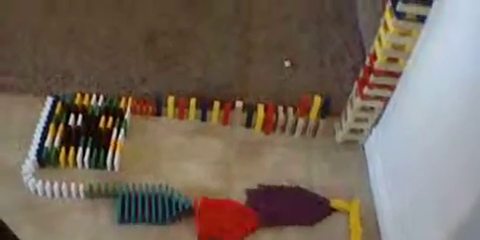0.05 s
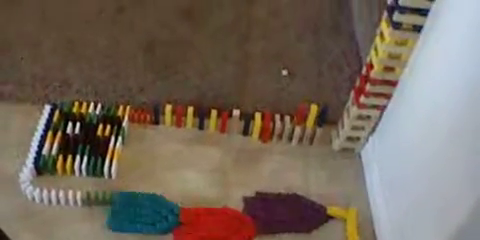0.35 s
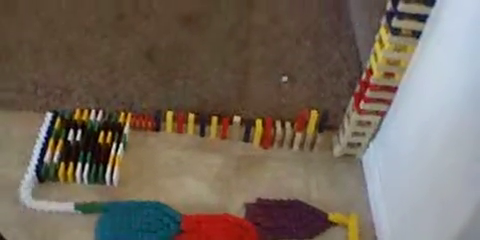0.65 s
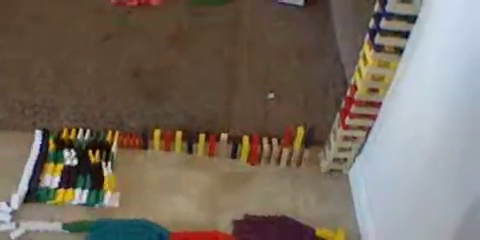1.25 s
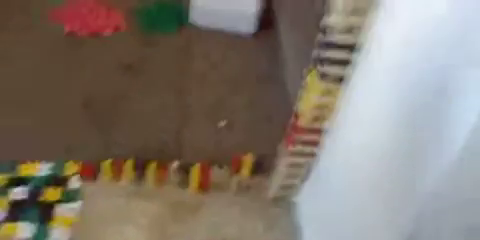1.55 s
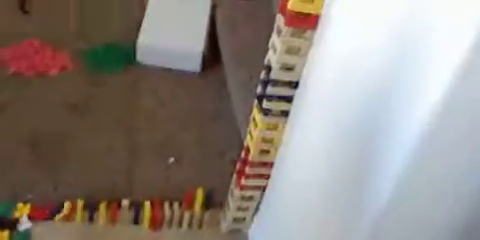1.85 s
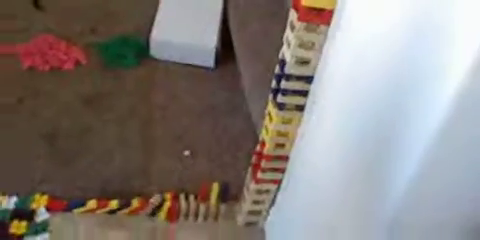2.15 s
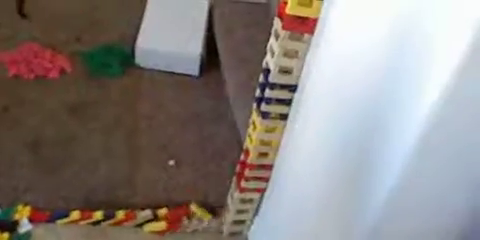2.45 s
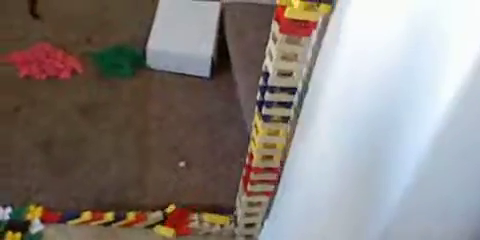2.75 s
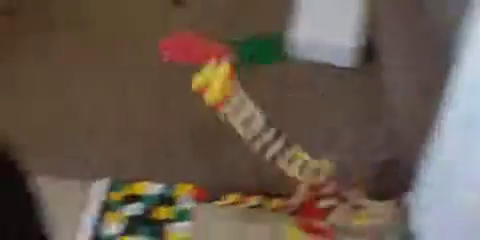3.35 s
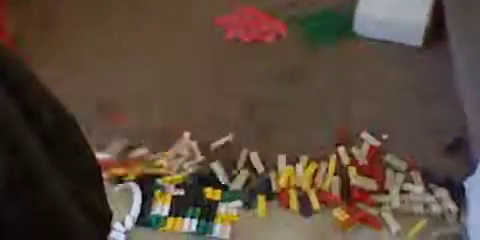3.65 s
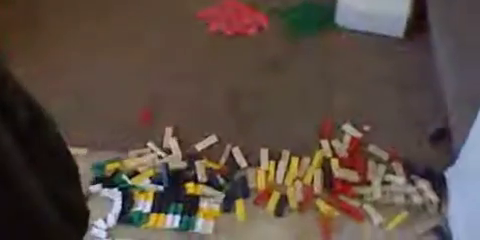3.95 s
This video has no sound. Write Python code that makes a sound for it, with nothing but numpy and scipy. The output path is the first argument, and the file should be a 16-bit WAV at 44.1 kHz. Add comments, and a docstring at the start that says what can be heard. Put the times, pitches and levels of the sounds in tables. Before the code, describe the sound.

Dominoes topple in a rattling chain, then a tall block tower crashes down indoors.

```python
"""Dominoes on a board laid over carpet in a small room, a small microphone nearby, a low mains hum beneath.
First two fields of plastic tiles rattle down, each contact a crack and a short ring; the board knocks.
From about 1.9 s a slower row of wooden blocks follows and knocks the foot out of a tall tower.
The tower sheds pieces from 2.6 s and crashes down in a heap from 3.3 s; the walls smear the clatter."""
import sys
import numpy as np
from scipy import signal
from scipy.fft import rfft, irfft
from scipy.io import wavfile

SR = 44100
rng = np.random.default_rng(int(sys.argv[2]) if len(sys.argv) > 2 else 0)


def int16_out(signal):
    """Quantize to a 16-bit WAV file."""
    q = np.round(np.clip(np.atleast_2d(signal).T, -1, 1) * 32767)
    wavfile.write(sys.argv[1], SR, q.astype(np.int16))


N = 176400
TIME = np.arange(N) / SR

# ring of a plastic tile and of the floor under it (frequency [Hz], level [dB], t60 [s])
PLASTIC_MODES = [(2192, -1.5, 0.01), (3530, 0.5, 0.0073), (4254, 5.5, 0.0086), (5756, -2, 0.027),
                 (7120, -14.5, 0.0099)]
FLOOR_MODES = [(336, 0.5, 0.021), (612, -1.5, 0.023), (775.4, 1, 0.028), (1000, -0.5, 0.039),
               (1595, 1, 0.027)]


def amp(db):
    """Decibels to gain."""
    return 10 ** (np.asarray(db) / 20)


def unit(x):
    """Scale to rms 1."""
    return x / np.sqrt(np.mean(x ** 2) + 1e-20)


def on_log_axis(points, size):
    """Interpolate (frequency [Hz], value) points at the bins of a transform."""
    hz, value = np.array(points, float).T
    return np.interp(np.log(np.arange(size // 2 + 1) * SR / size + 1), np.log(hz), value)


def colour(x, points, size=4096):
    """Minimum-phase EQ through (frequency [Hz], gain [dB]) points."""
    cepstrum = irfft(np.log(amp(on_log_axis(points, size))))
    cepstrum[1:size // 2] *= 2
    cepstrum[size // 2 + 1:] = 0
    return signal.fftconvolve(x, irfft(np.exp(rfft(cepstrum))))[:N]


def room_tone(air_db=-54.5):
    """Mains hum and faint air, there from the start."""
    hum_tones = [(59.2, -49.5), (118.4, -72), (199.2, -63.5)]  # (frequency [Hz], rms level [dB])
    air_eq = [(25, 0), (40, 0), (80, -1.5), (500, -8.5), (1500, -28.5), (5000, -20.5), (8500, -33.5)]  # (frequency [Hz], gain [dB])
    hum = sum(np.sqrt(2) * amp(db) * np.sin(2 * np.pi * (hz * TIME + rng.random()))
              for hz, db in hum_tones)
    return hum + amp(air_db) * unit(colour(rng.standard_normal(N), air_eq))


def room(x, size=32768, echoes=12):
    """One spot to the microphone: direct sound, floor and wall echoes, a tail shorter in the treble."""
    reverb_times = [(150, 0.25), (500, 0.45), (1500, 0.57), (3500, 0.44), (7500, 0.24)]  # (frequency [Hz], t60 [s])
    tail_db, tail_delay_s, early_db, early_s = -5, 0.0069, -7, .012
    t = TIME[:size]
    noise, tail = rfft(rng.standard_normal(size)), 0
    for k, (_, t60) in enumerate(reverb_times):
        band = on_log_axis([(hz, j == k) for j, (hz, _) in enumerate(reverb_times)], size)
        tail = tail + irfft(noise * band) * np.exp(-np.log(1000) * t / t60)
    response = amp(tail_db) * unit(tail * np.clip(t / tail_delay_s - 1, 0, 1)) / np.sqrt(size)
    lags = (SR * early_s * rng.uniform(0.1025, 1, echoes)).astype(int)
    response[lags] += amp(early_db) * rng.choice([-1, 1], echoes) / np.sqrt(echoes)
    response[0] += 1
    return signal.fftconvolve(x, unit(response) / np.sqrt(size))[:N]


def contacts(times, strengths, modes, crack_db, spread, tilt_db=None, size=1024):
    """Each contact is a crack of noise and a ring; no two pieces have quite the same pitch."""
    crack_decay_s, pivot_hz = 0.00081, 4000
    t = TIME[:size]
    ring = 0
    for hz, db, t60 in modes:
        weight, detune = rng.standard_normal((2, len(times), 1))
        tone = np.sin(2 * np.pi * hz * np.exp(spread * detune) * t)
        ring = ring + amp(db) * weight * np.exp(-np.log(1000) * t / t60) * tone
    crack = rng.standard_normal((len(times), size)) * np.exp(-t / crack_decay_s)
    grains = unit(ring) + amp(crack_db) * unit(crack)
    grains *= (strengths / np.sqrt(np.sum(grains ** 2, axis=1)))[:, None]
    if tilt_db is not None:  # brightness of each contact, per octave
        octaves = np.clip(np.log2(np.linspace(1, SR / 2, size + 1) / pivot_hz), -2, 1)
        grains = irfft(rfft(grains, 2 * size) * amp(tilt_db[:, None] * octaves))[:, :size]
    places = (np.maximum(times, 0) * SR).astype(int)[:, None] + np.arange(size)
    return np.bincount(places.ravel(), grains.ravel(), N)[:N]


def clatter(levels, modes, eq, click_db, knock_db, spread, count, scatter_db=4, crack_db=10):
    """A stream of contacts of uneven strength: clicks above, knocks on the floor below."""
    crossover_hz = 1240
    when, clicks, knocks = np.array(levels).T
    length = when[-1] - when[0]
    times = when[0] + length * (np.arange(count) + rng.uniform(0, 2, count)) / count
    strengths = amp(scatter_db * np.clip(rng.standard_normal(count), -2, 2))
    out = 0
    for side, rings, db in (("high", modes, clicks + click_db), ("low", FLOOR_MODES, knocks + knock_db)):
        stream = colour(contacts(times, strengths, rings, crack_db, spread), eq)
        band = signal.sosfilt(signal.butter(3, crossover_hz, side, fs=SR, output="sos"), stream)
        out = out + unit(band) * np.sqrt(length * SR / N) * amp(np.interp(TIME, when, db))
    return out


def hollow(x, ring_db, width_hz=55):
    """A narrow resonance under the falling tiles shifts as the front advances."""
    pitch_path = [(.25, 730), (.57, 1000), (.72, 874), (1.22, 830), (1.39, 835), (1.44, 960), (1.54, 894),
                  (1.66, 820)]  # (time [s], frequency [Hz])
    turn = np.exp(2j * np.pi * np.cumsum(np.interp(TIME, *np.array(pitch_path).T)) / SR)
    pole = np.exp(-np.pi * width_hz / SR)
    resonance = 2 * np.real(turn * signal.lfilter([1 - pole], [1, -pole], x / turn))
    return x + amp(ring_db) * resonance


def tile_fields():
    """Two fields of plastic tiles run down in turn, each at its own place in the room."""
    # rattle of each field (time [s], relative click level [dB], relative knock level [dB])
    first_levels = [(0, -23.5, -41.5), (.15, -41.5, -53), (.25, -30, -41), (.32, -38, -50),
                    (.44, -35.5, -47), (.52, -35, -49.5), (.59, -38, -45), (.73, -37.5, -51),
                    (.8, -51, -53), (.9, -49.5, -57.5), (.97, -45, -55.5), (1.13, -48, -55)]
    second_levels = [(1.13, -48, -57), (1.22, -43, -45.5), (1.37, -44.5, -43), (1.45, -36.5, -40.5),
                     (1.6, -35, -44), (1.7, -39.5, -52), (1.74, -78, -76), (1.85, -72, -76)]
    # tone of each field (frequency [Hz], gain [dB])
    first_eq = [(110, -21), (160, -2), (225, -14), (300, 1.5), (400, -7.5), (550, -8.5), (980, -7.5),
                (1400, -5.5), (3800, -4), (5900, -5), (8500, -16)]
    second_eq = [(120, -11.5), (300, -14.5), (720, -8.5), (880, -7.5), (1080, -6.5), (1600, 0.5),
                 (4200, -2.5), (7000, -7), (8500, -20.5)]
    first = clatter(first_levels, PLASTIC_MODES, first_eq,
                    click_db=-5, knock_db=3.5, spread=0.219, count=620)
    second = clatter(second_levels, PLASTIC_MODES, second_eq,
                     click_db=-0.5, knock_db=-1, spread=0.224, count=750)
    return room(hollow(first, ring_db=-6)) + room(hollow(second, ring_db=5))


def board_knocks(rise_s=0.0088, blur_hz=14):
    """A whole rank lands flat: the board gives a brief hollow knock at a blurred pitch."""
    landings = [(0.011, 839, -37), (0.23, 295, -39.5), (0.309, 303, -33), (.558, 280.3, -33.5),
                (.672, 910, -39), (1.368, 841, -36), (1.45, 920, -37.5), (1.53, 893, -42.5),
                (2.979, 950, -32.5), (3.32, 780, -22), (3.417, 963, -21), (3.485, 770, -25.5),
                (3.752, 801, -24.5)]  # (time [s], pitch [Hz], level [dB])
    phase_drift = np.cumsum(rng.standard_normal(N)) * np.sqrt(2 * np.pi * blur_hz / SR)
    out = 0
    for start, hz, db in landings:
        age = np.maximum(TIME - start, 0) / rise_s
        out = out + amp(db) * age * np.exp(1 - age) * np.sin(2 * np.pi * hz * TIME + phase_drift)
    return out


def clacks(blows, modes, eq, knock_db, crack_db, spread, count, click_db=14, rebound_db=-1):
    """Each blow has a few fading rebounds; all of them also knock on the floor."""
    floor_eq = [(60, -32), (150, -6.5), (380, -8.5), (640, 2.5), (900, 0), (1400, -0.5), (2500, -25),
                (6000, -42)]  # (frequency [Hz], gain [dB])
    start, db, floor_db, rattle_s, tilt_db = np.array(blows).T[:, :, None]
    step = np.arange(count)
    is_rebound = step > 0
    progress = (step + rng.uniform(-.5, .5, (len(blows), count))) / count * is_rebound
    times = (start + rattle_s * progress).ravel()
    strengths = amp(db + rebound_db * is_rebound) * np.exp(-progress)
    click = contacts(times, strengths.ravel(), modes, crack_db, spread, np.repeat(tilt_db, count))
    knock = contacts(times, (strengths * amp(floor_db)).ravel(), FLOOR_MODES, crack_db=1, spread=.12)
    return amp(click_db) * colour(click, eq) + amp(knock_db) * colour(knock, floor_eq)


def tile_slaps():
    """Plastic tiles slap down and bounce."""
    # (time [s], relative level [dB], floor knock offset [dB], rattle [s], brightness [dB/octave])
    slaps = [(.0144, -15, -38, 0.014, 6), (.0275, -22.5, -8, 0.017, -6), (.222, -26.5, -2, 0.033, -8),
             (.2828, -15.5, -14, 0.022, -3), (.310, -19, -38, 0.022, 0.5), (.5482, -23.5, -14, 0.017, 8),
             (.563, -15.5, -25, 0.033, 0), (.842, -31.5, -7, 0.03, 1), (.9223, -30.5, -10, 0.031, -5),
             (.9552, -23.5, -26, .045, -2.5), (1.004, -28, -25, 0.04, -3), (1.3892, -28.5, -20, 0.0051, 5),
             (1.4022, -16.5, -19, 0.012, 0), (1.5653, -17, -9, 0.025, -3.5), (1.7, -24.5, -8, 0.021, 4.5)]
    eq = [(300, -24.5), (1000, -5.5), (2000, -2.5), (4000, 4.5), (7500, 1), (8500, -14)]  # (frequency [Hz], gain [dB])
    return room(clacks(slaps, PLASTIC_MODES, eq, knock_db=11.5, crack_db=10, spread=0.11, count=7))


def tile_snaps(gain_db=14):
    """Single tiles snap edge against edge: bright clicks that stand out of the rattle."""
    snaps = [(.0272, -15.5), (0.3039, -15.5), (0.3096, -16.5), (1.4102, -13), (1.417, -21), (1.4242, -22),
             (1.439, -19), (1.466, -16.5), (1.4712, -17.5), (1.475, -26), (1.484, -23), (1.49, -15.5),
             (1.5235, -19), (1.5295, -16.5)]  # (time [s], relative level [dB])
    edge_modes = [(4620, -8.5, .008), (5680, 0, 0.0066), (7140, 0.5, .012)]  # (frequency [Hz], level [dB], t60 [s])
    eq = [(1000, -20), (3000, 6), (5000, 2.5), (7500, -1), (8500, -12)]  # (frequency [Hz], gain [dB])
    times, db = np.array(snaps).T
    clicks = contacts(times, amp(db + gain_db), edge_modes, crack_db=0.5, spread=0.069)
    return room(colour(clicks, eq))


def wooden_row():
    """Wooden blocks topple: a quiet running clatter, with clacks where they strike each other."""
    wood_modes = [(1440, -8.5, .03), (3050, -11, .02), (4110, -2.5, 0.015), (4580, -4.5, 0.017),
                  (6000, -10.5, 0.013), (7300, -8.5, 0.02)]  # (frequency [Hz], level [dB], t60 [s])
    run_levels = [(1.98, -65, -62), (2.12, -57.5, -56), (2.18, -46.5, -48), (2.38, -50.5, -53),
                  (2.46, -50, -49.5), (2.58, -51, -50), (2.8, -50.5, -55.5), (2.93, -49.5, -52.5),
                  (3.12, -32, -44.5), (3.26, -48, -51.5)]  # (time [s], relative click level [dB], relative knock level [dB])
    # (time [s], relative level [dB], floor knock offset [dB], rattle [s], brightness [dB/octave])
    blows = [(1.931, -43, -12, 0.014, 5), (2.0657, -40.5, -5, 0.021, 2), (2.1505, -29.5, -8, 0.019, -3),
             (2.183, -31, -19, 0.018, 7.5), (2.3059, -31.5, -4, 0.008, 10.5), (2.3208, -34, -8.5, .016, 3),
             (2.3957, -27.5, -17, 0.0046, -2), (2.4279, -19.5, -16, 0.0077, 5), (2.443, -23, -20, 0.012, 0),
             (2.473, -27, -15, .012, -1), (2.487, -24.5, -13, 0.0063, 0.5),
             (2.5102, -20.5, -21, 0.0076, -0.5), (2.8789, -38.5, 7.5, 0.022, 12),
             (2.9522, -26, -16, 0.017, -7.5), (3.05, -28, -4, 0.0048, -8), (3.1852, -22, -14, 0.014, -9),
             (3.263, -12.5, -20, 0.0022, -6.5), (3.27, -11.5, -6, 0.0032, -4.5)]
    # tone of the run and of the blows (frequency [Hz], gain [dB])
    run_eq = [(110, -12), (155, 8.5), (230, -4.5), (620, -1), (1000, -6.5), (2100, -11.5), (3300, -13.5),
              (5400, -19.5), (7300, -25.5), (8500, -37)]
    blow_eq = [(300, -23), (1000, -17.5), (2200, -6), (4200, 2.5), (5500, -1.5), (7300, -5), (8500, -20.5)]
    run = clatter(run_levels, wood_modes, run_eq,
                  click_db=-3, knock_db=3.5, spread=0.15, count=450, scatter_db=2, crack_db=9)
    strikes = clacks(blows, wood_modes, blow_eq,
                     knock_db=21.5, crack_db=3, spread=0.065, count=6, rebound_db=-1.5)
    return room(run) + room(strikes)


def tower_collapse(spots=3):
    """Storeys give way and land; the pieces scatter over several spots, each with its own echoes."""
    # (time [s], relative level [dB], floor knock offset [dB], rattle [s], brightness [dB/octave])
    blows = [(2.5998, -13.5, -13, 0.012, -1), (2.6135, -14.5, -1, 0.017, 5.5),
             (2.633, -13, -4.5, 0.025, 2.5), (2.976, -20, 0, 0.018, -4), (3.061, -19.5, -11, .012, -1),
             (3.0774, -14.5, -1.5, 0.029, -2.5), (3.283, -17, -12, 0.004, -1),
             (3.2887, -6, -17, 0.001745, 10), (3.2937, -9.5, -8.5, .002, 11), (3.3195, -5, -8.5, 0.016, -3),
             (3.342, -7.5, -16, 0.022, -4), (3.4444, -3.5, -15.5, 0.025, 4.5), (3.47, -2.5, -7, 0.03, 2.5),
             (3.565, -9.5, -18, 0.03, -1.5), (3.6608, -3.5, -20, 0.024, 16.5),
             (3.6792, -4.5, -11, 0.026, 5.5), (3.9188, -8, -38, .012, -0.5)]
    heap_levels = [(3.305, -21, -31), (3.345, -30, -19.5), (3.37, -28, -24), (3.41, -21, -22),
                   (3.485, -23, -31), (3.515, -46, -25.5), (3.55, -29.5, -40), (3.595, -15.5, -25),
                   (3.64, -16, -23), (3.675, -9, -22), (3.715, -16, -43), (3.76, -27.5, -25.5),
                   (3.79, -21, -27), (3.93, -23.5, -30.5), (4.0, -34.5, -31)]  # (time [s], relative click level [dB], relative knock level [dB])
    # tone of the blows and of the heap (frequency [Hz], gain [dB])
    blow_eq = [(300, -8.5), (900, 3), (2000, 3), (3500, 4.5), (5000, 2), (7000, -5), (8500, -17)]
    heap_eq = [(60, -7), (146, 2.5), (190, -3.5), (350, -3), (560, -1), (800, 2), (1500, 0.5), (3400, 2),
               (7500, -2.5), (8500, -19)]
    out = 0
    for spot in range(spots):
        storeys = clacks(blows[spot::spots], PLASTIC_MODES, blow_eq,
                         knock_db=16, crack_db=7, spread=0.22, count=9)
        heap = clatter(heap_levels, PLASTIC_MODES, heap_eq,
                       click_db=-2, knock_db=-2.5, spread=0.192, count=280)
        out = out + room(storeys + heap / np.sqrt(spots))
    return out


def tower_thuds():
    """The trunk, then the top of the tower meet the floor, each with a burst of low noise."""
    landings = [(3.342, -17.5, 0.014), (3.656, -26.5, 0.033)]  # (time [s], level [dB], decay [s])
    eq = [(40, -27), (90, 1), (200, 2), (350, 7.5), (600, -0.5), (1500, -32)]  # (frequency [Hz], gain [dB])
    swell = 0
    for start, db, decay_s in landings:
        age = np.maximum(TIME - start, 0) / decay_s
        swell = swell + amp(db) * np.sqrt(2 * np.e * age) * np.exp(-age)
    return room(swell * unit(colour(rng.standard_normal(N), eq)))


def scene():
    """Room tone, tiles, blocks and tower as they reach the microphone, in mono."""
    return (room_tone() + tile_fields() + board_knocks() + tile_slaps() + tile_snaps()
            + wooden_row() + tower_collapse() + tower_thuds())[None]


def record(dry):
    """A small camera microphone: the loudest peaks are rounded; the treble rolls off softly, then ends."""
    rolloff_hz, headroom, top_hz = 8450, .8, 8900
    soft = signal.sosfilt(signal.butter(10, rolloff_hz, fs=SR, output="sos"), dry)
    rounded = soft / (1 + (soft / headroom) ** 6) ** (1 / 6)
    steep_lowpass = signal.firwin(255, top_hz, window=("kaiser", 9), fs=SR)
    return signal.fftconvolve(rounded, steep_lowpass[None], "same")


dry = scene()
out = record(dry)
int16_out(out)
```